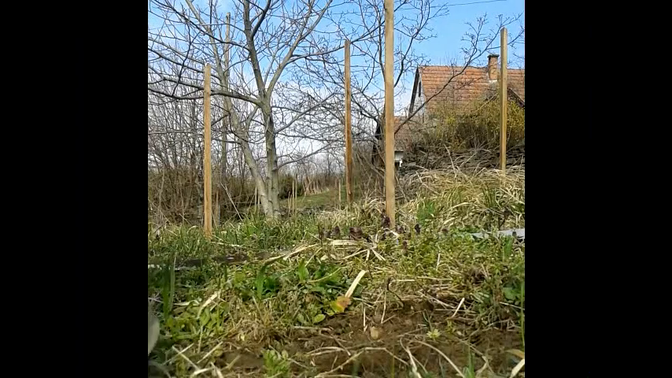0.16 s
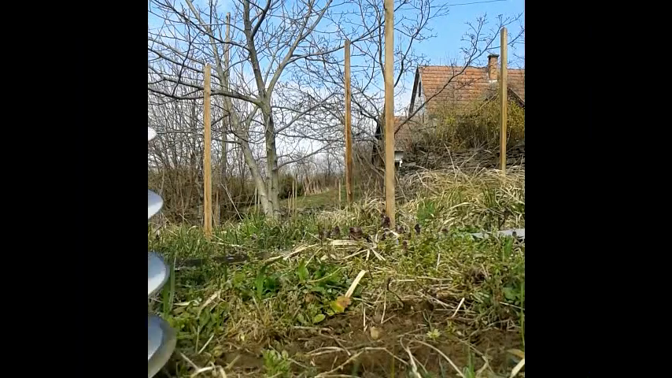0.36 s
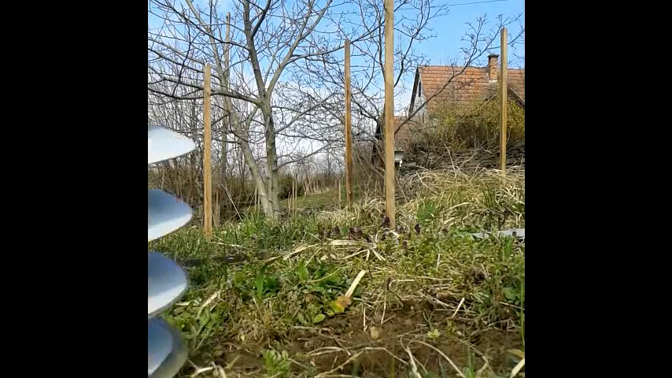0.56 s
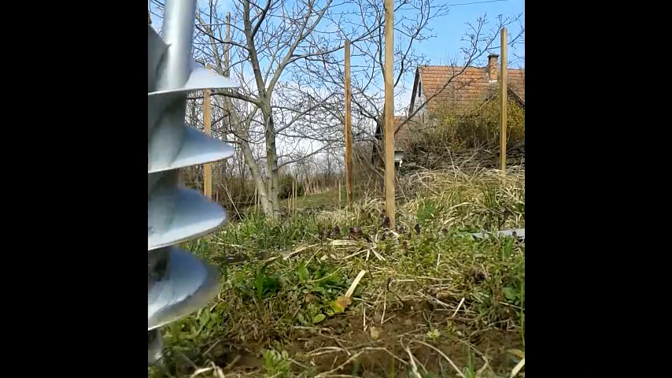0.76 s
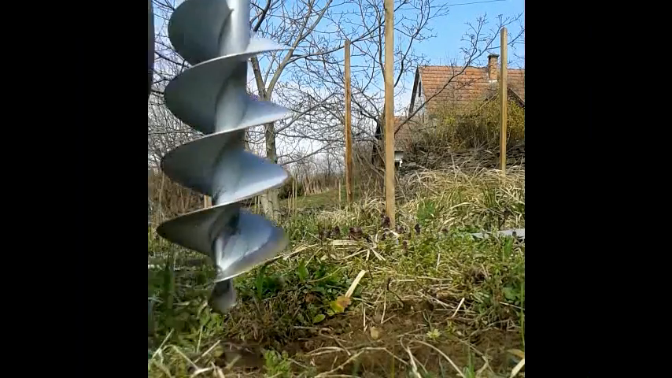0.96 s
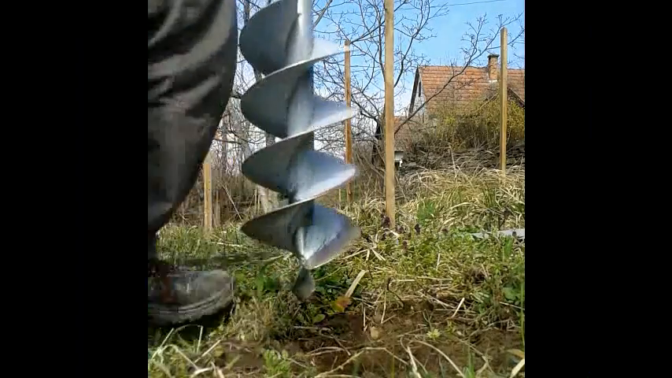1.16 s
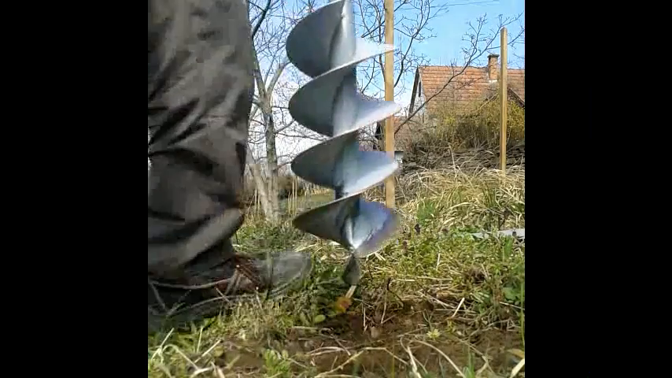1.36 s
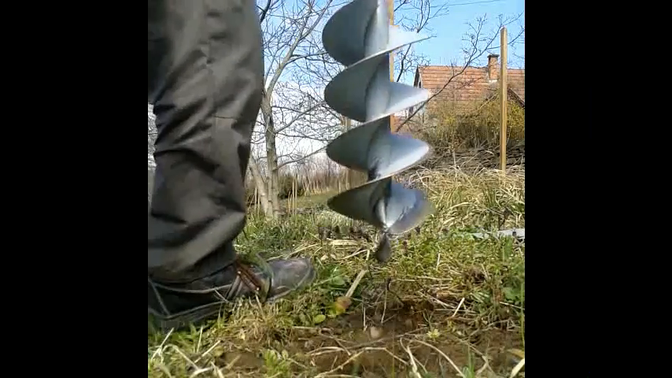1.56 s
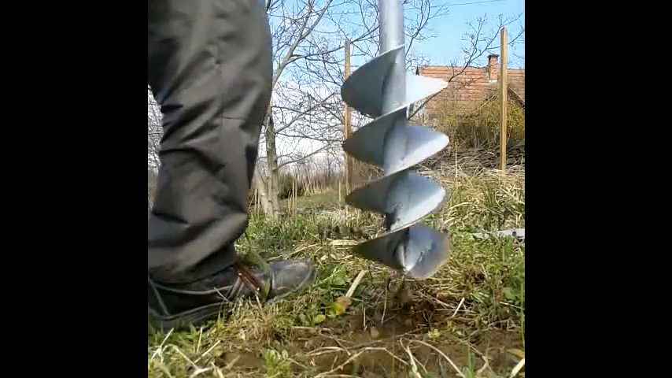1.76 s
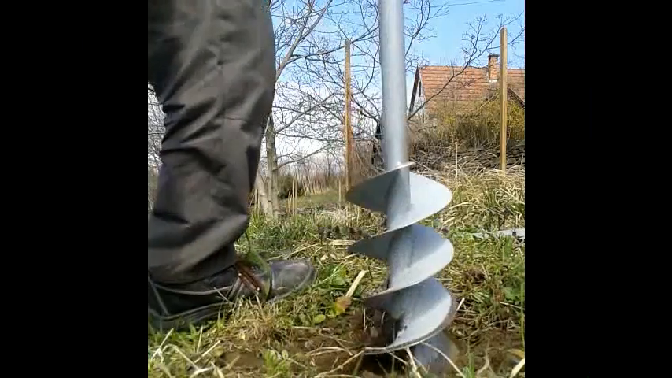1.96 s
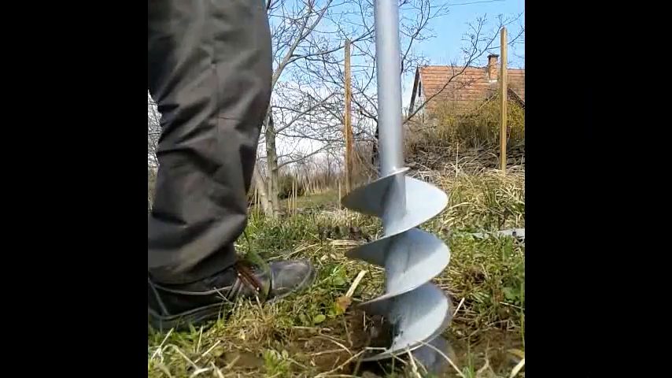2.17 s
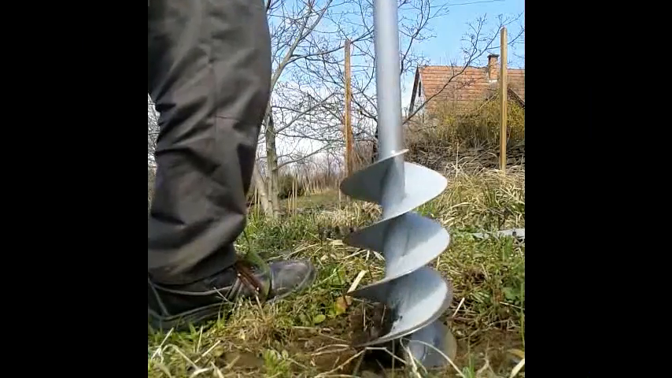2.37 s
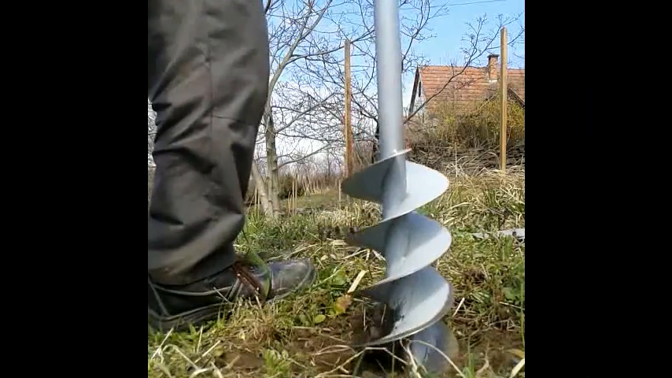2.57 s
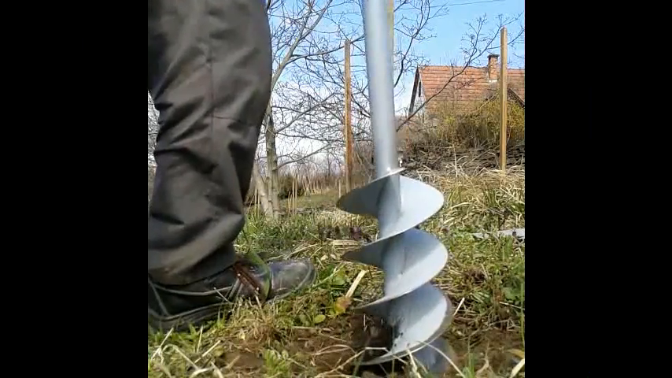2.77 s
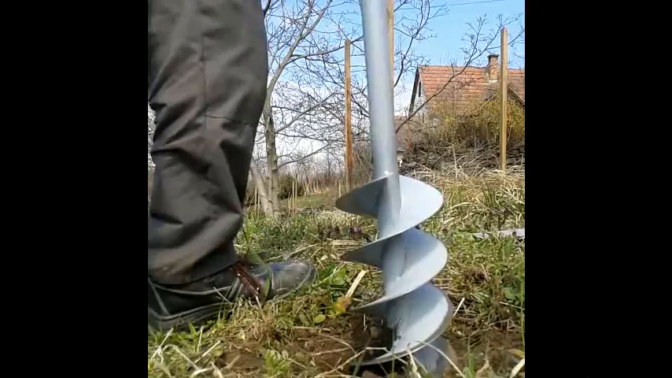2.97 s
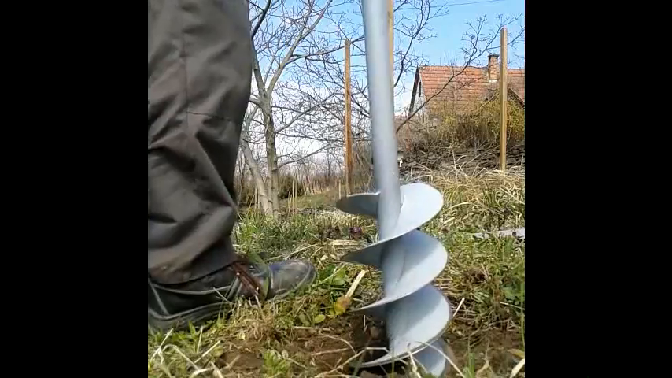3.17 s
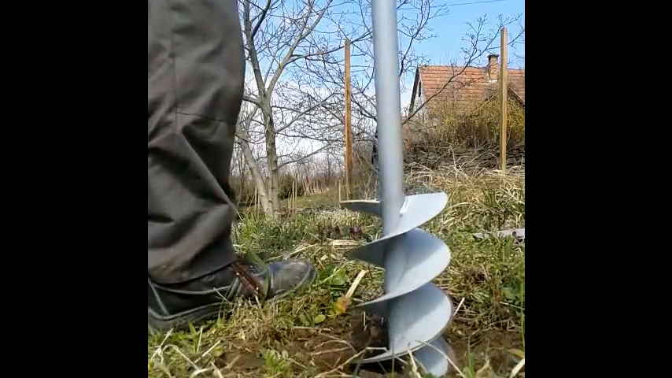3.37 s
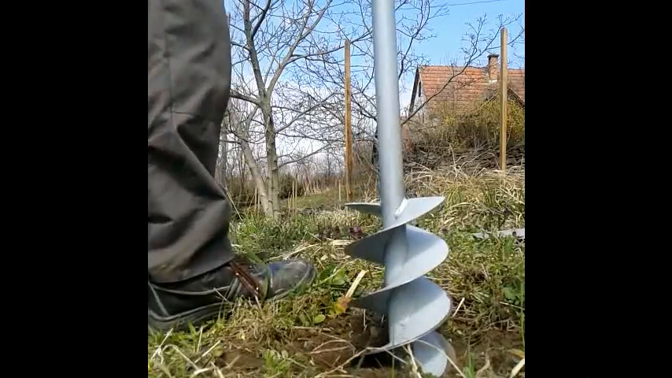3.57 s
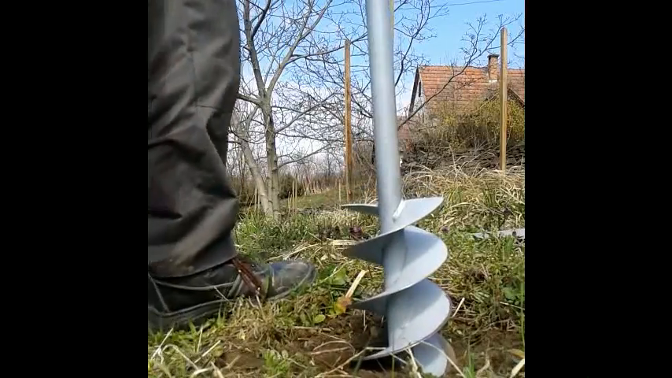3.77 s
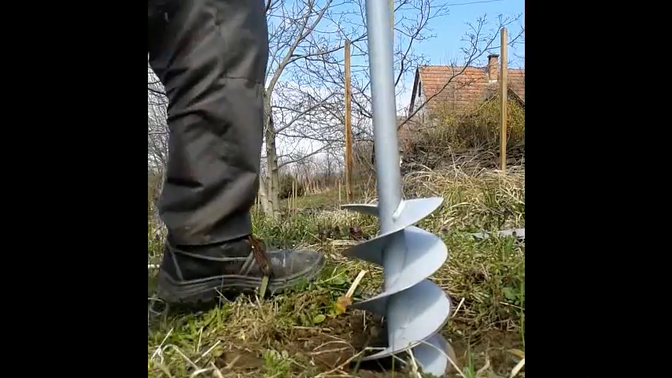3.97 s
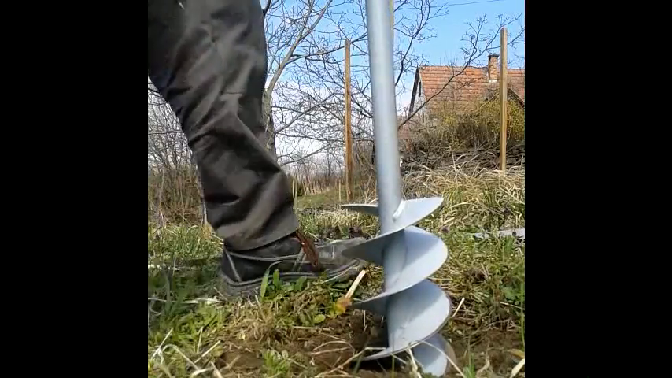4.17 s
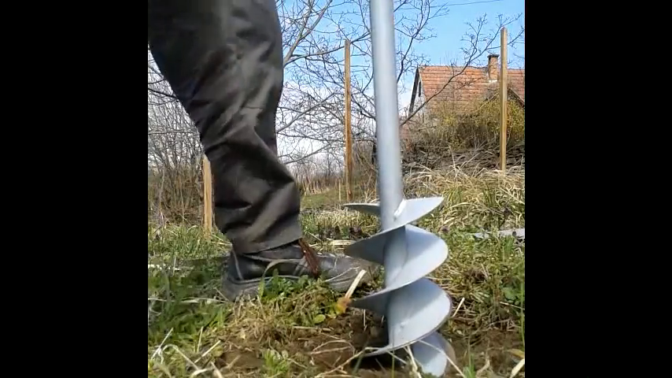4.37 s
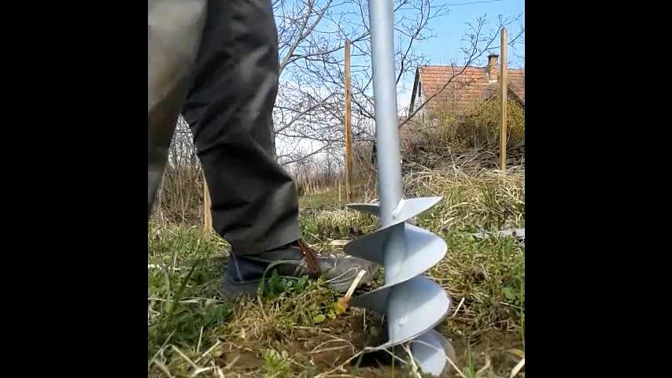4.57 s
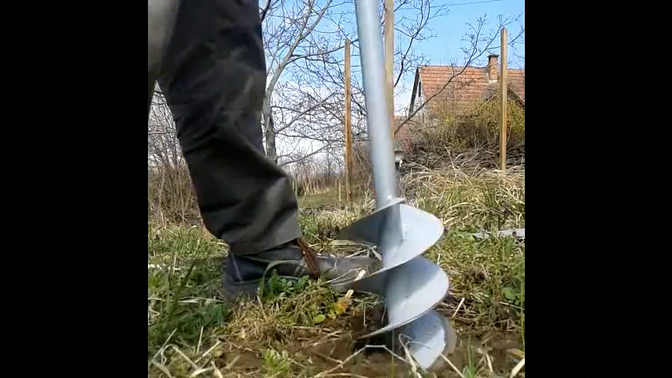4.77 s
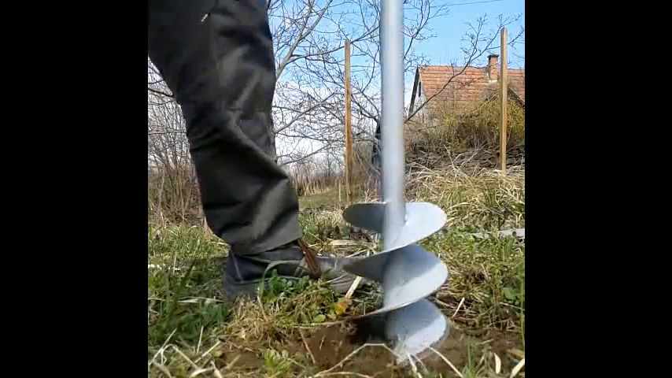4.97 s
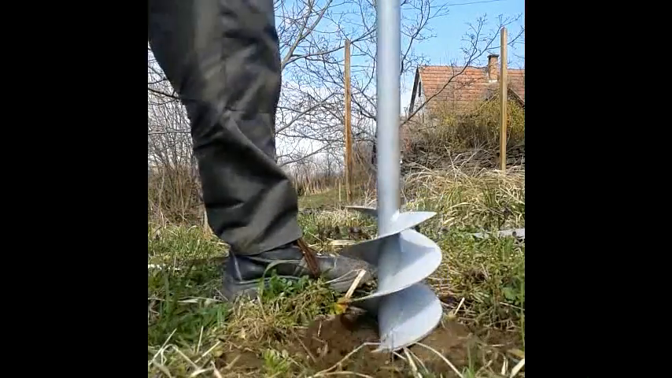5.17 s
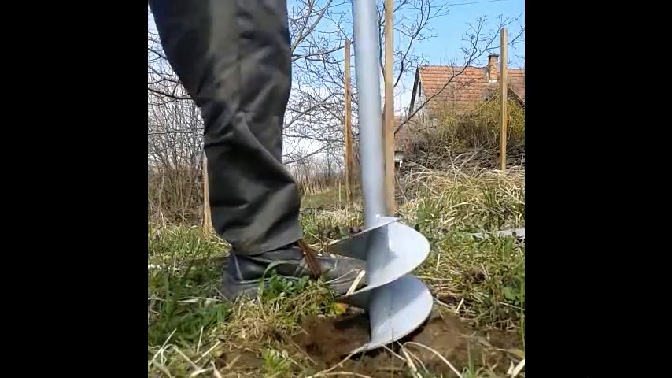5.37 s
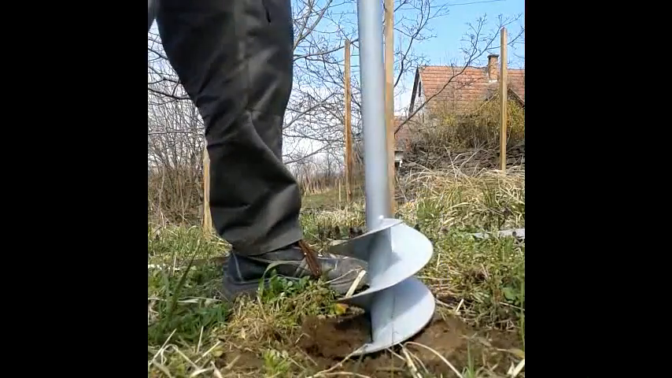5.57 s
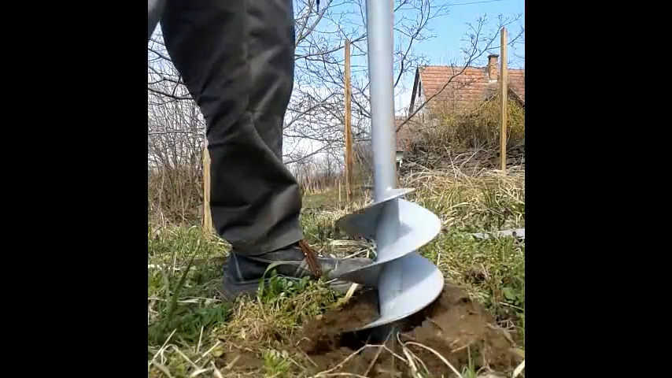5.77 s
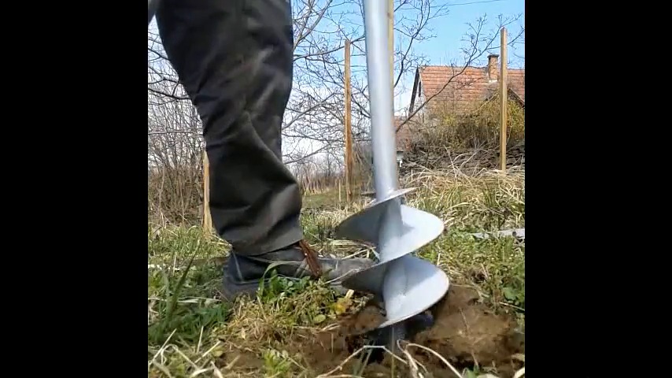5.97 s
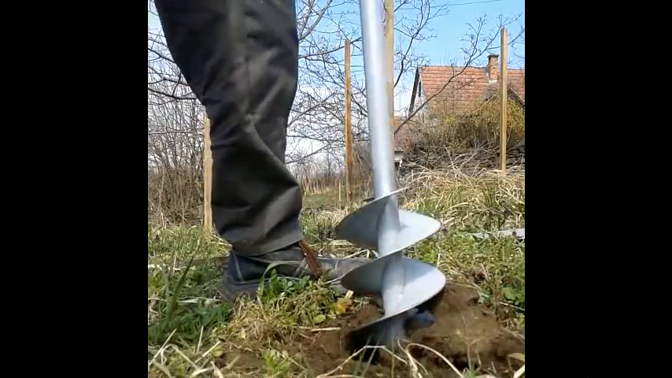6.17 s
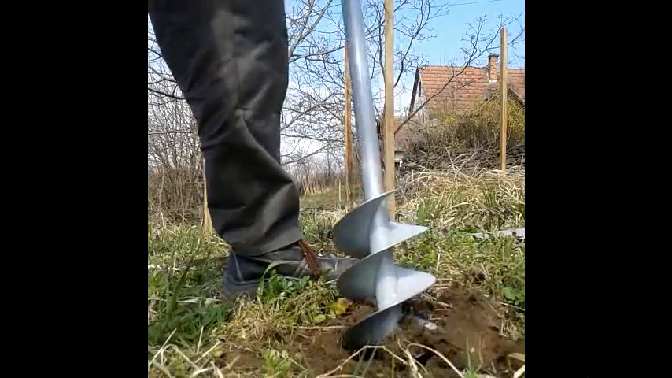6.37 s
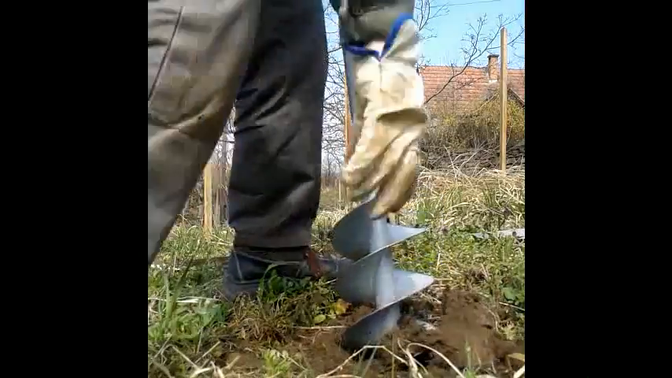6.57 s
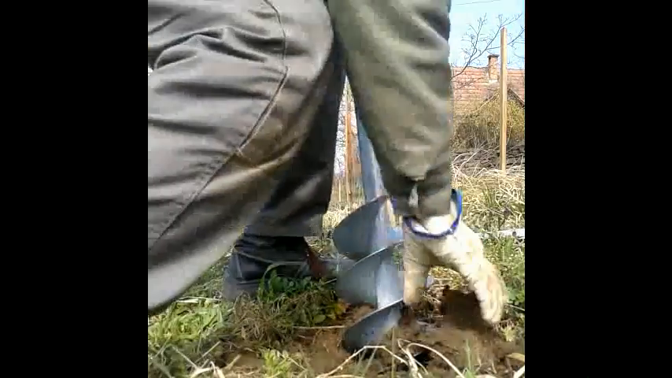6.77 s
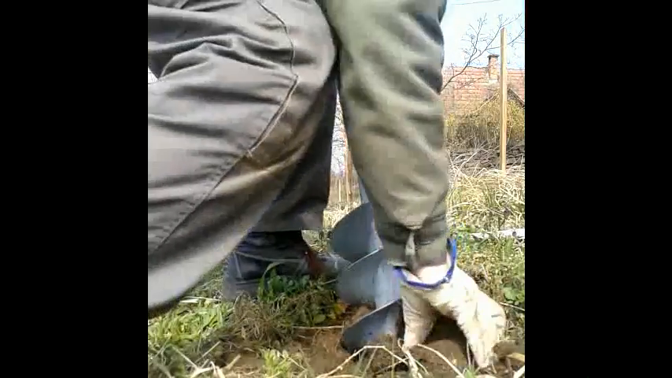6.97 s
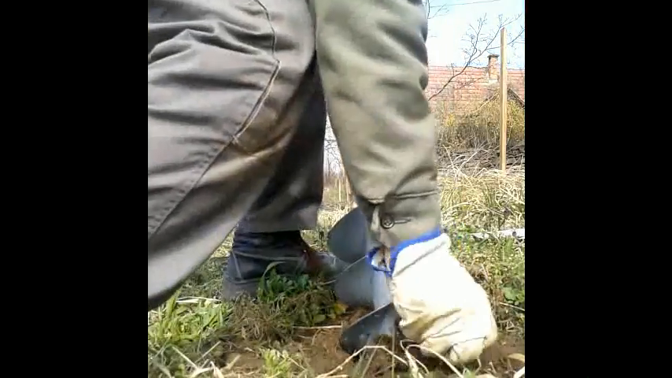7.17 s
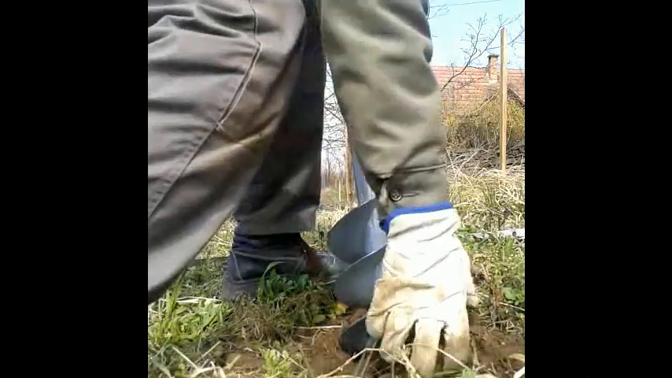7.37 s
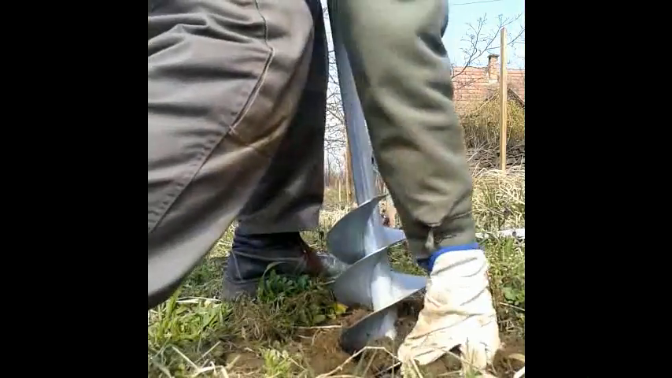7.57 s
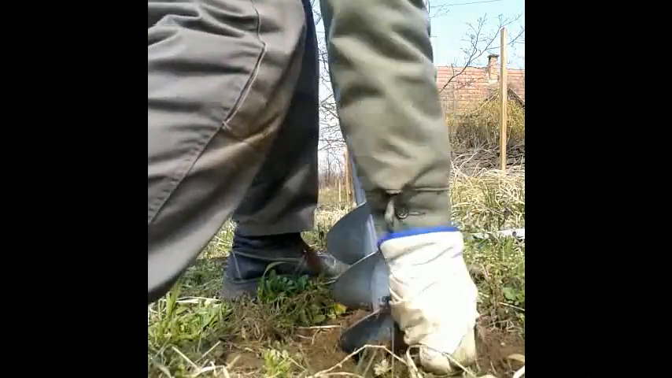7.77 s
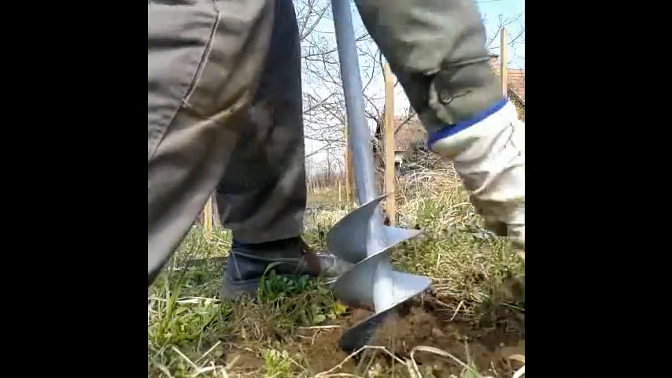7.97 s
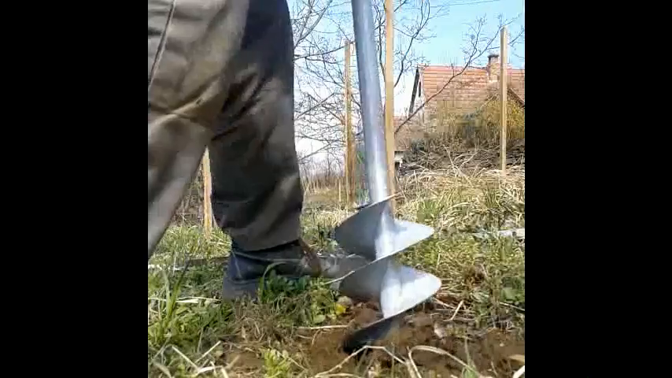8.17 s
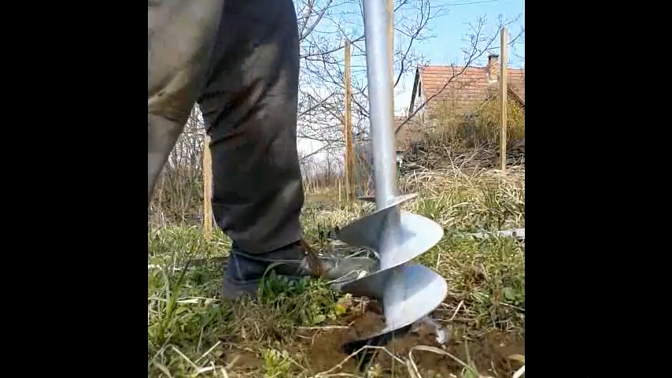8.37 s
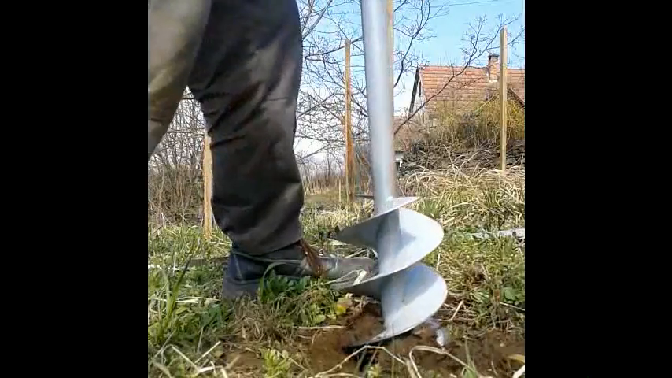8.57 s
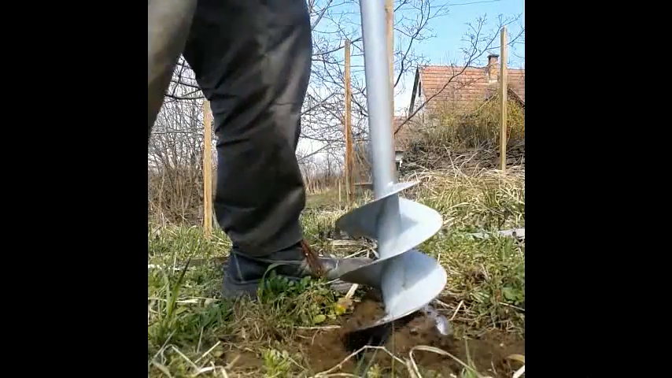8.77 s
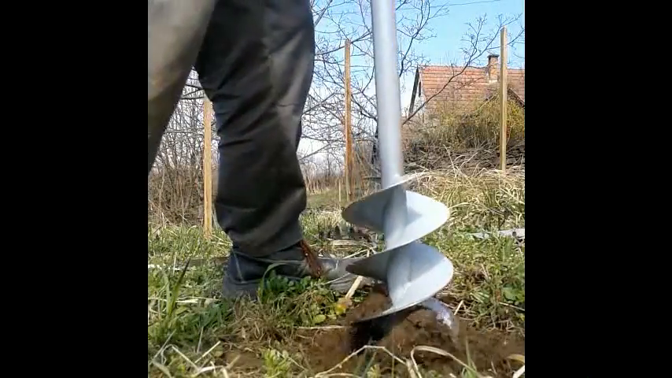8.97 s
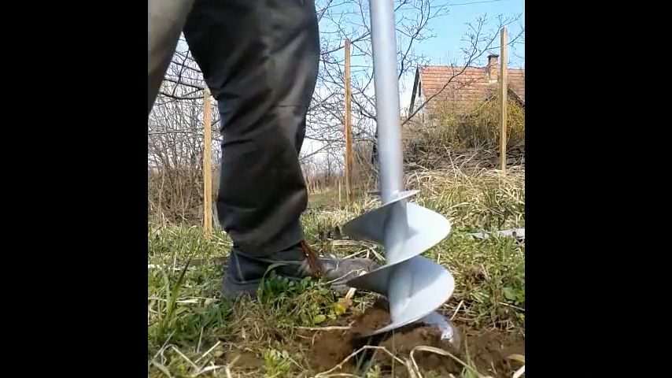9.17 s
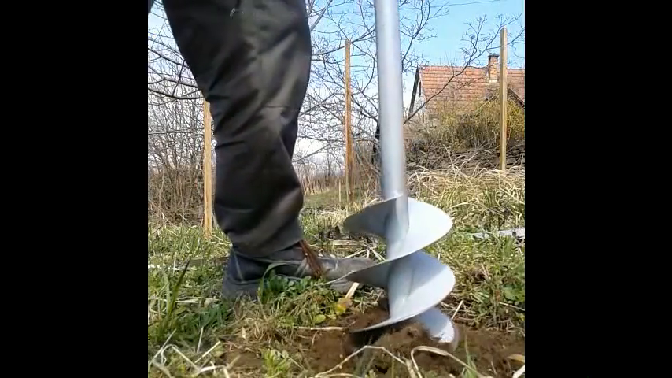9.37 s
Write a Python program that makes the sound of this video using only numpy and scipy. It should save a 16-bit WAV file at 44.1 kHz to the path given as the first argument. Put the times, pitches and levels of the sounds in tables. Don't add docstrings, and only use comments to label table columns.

```python
import sys
import numpy as np
from scipy import signal
from scipy.fft import rfft, irfft
from scipy.io import wavfile
from scipy.ndimage import uniform_filter1d

SR = 44100
rng = np.random.default_rng(int(sys.argv[2]) if len(sys.argv) > 2 else 0)


def generate_wav(signal):
    frames = np.transpose(np.atleast_2d(signal))
    scaled = np.clip(frames, -1, 1) * 32767
    pcm = np.round(scaled).astype(np.int16)
    wavfile.write(sys.argv[1], SR, pcm)


def nominal_scale(level):
    x = np.asarray(level, float) / 20
    return 10 ** x


N = 415863


def unit(x):
    return x / np.sqrt(np.mean(x ** 2))


def colour(x, points):
    size = 2048
    hz, db = np.transpose(points)
    f = np.maximum(np.arange(size // 2 + 1) * SR / size, 1)
    gain_db = np.interp(np.log(f), np.log(hz), db)
    cepstrum = irfft(np.log(nominal_scale(gain_db)), size)
    cepstrum[1:size // 2] *= 2
    cepstrum[size // 2 + 1:] = 0
    impulse = irfft(np.exp(rfft(cepstrum)), size)
    return unit(signal.fftconvolve(x, impulse)[:N])


def ring(x, hz, t60):
    decay = np.log(1000) / (max(t60, 0.004) * SR)
    pole = np.exp(2j * np.pi * hz / SR - decay)
    return signal.lfilter([1], [1, -pole], x).imag


def walk(rate):
    k = int(SR / rate)
    held = np.repeat(rng.standard_normal(N // k + 1), k)
    return 1.3 * uniform_filter1d(uniform_filter1d(held, k), k)[:N]


def grains(rate, spread_db, bed):
    hit = rng.random(N) < rate / SR
    grain_size = np.minimum(rng.exponential(size=N), 3.0)
    clicks = hit * rng.standard_normal(N) * nominal_scale(spread_db * grain_size)
    return unit(unit(clicks) + bed * rng.standard_normal(N))


def swell(rise, t60):
    t = np.arange(SR // 2) / SR
    build_up = (1 - np.exp(-t / max(rise, 2e-4))) ** 2
    shape = build_up * np.exp(-np.log(1000) * t / max(t60, 0.005))
    return shape / shape.max()


def add(track, s, piece):
    i = int(s * SR)
    track[i:i + len(piece)] += piece[:N - i]


# frequency in Hz, level in dB per Hz.
AIR_TONE, AIR_DB = [(12, -18), (20, -9), (81, -10), (145, -10.5), (214, -13.5), (283, -14.5), (841, -23),
                    (1640, -21), (3690, -23), (6440, -22), (8510, -21), (11900, -31), (15700, -37)], -48


def air():
    gusts = nominal_scale(-66.5 + 2.9 * walk(5.0)) * unit(ring(rng.standard_normal(N), 50.0, 0.022))
    hush = colour(rng.standard_normal(N), AIR_TONE)
    return nominal_scale(AIR_DB - 6.5 + 1.32 * walk(2.434)) * hush + gusts


# start in seconds, length in seconds, grit level in dB, crumbs in dB relative to grit.
STROKES = [(0.0, 0.095, -52, -4.5), (0.16, 0.32, -50.5, -4), (0.7, 0.06, -42.5, -6),
           (0.92, 0.15, -51.5, -6), (1.294, 0.027, -39.5, -10), (1.474, 0.059, -58, -13),
           (2.043, 0.51, -50.5, -16), (2.803, 0.019, -44, -10), (3.023, 0.047, -40, -9),
           (3.125, 0.053, -33.5, -10), (3.292, 0.16, -36.5, -8.5), (3.586, 0.055, -54.5, -9),
           (4.052, 0.08, -45, -13), (4.189, 0.031, -41, -8.5), (4.362, 0.23, -45, -4.5),
           (4.67, 0.23, -40.5, -7), (4.917, 0.22, -38, -9), (5.125, 0.085, -37.5, -6),
           (5.444, 0.028, -54.5, -5.5), (5.796, 0.14, -45, -8.5), (6.12, 0.079, -43.5, -12.5),
           (6.37, 0.18, -43.5, -8), (6.688, 0.53, -50.5, -2.5), (7.577, 0.16, -51.5, 1.5),
           (7.893, 0.38, -58.5, -3.5), (8.177, 0.08, -47.5, -8), (8.42, 0.19, -50.5, -10),
           (8.63, 0.21, -49, -8), (8.984, 0.24, -49, -18), (9.357, 0.15, -43, -1.5)]
PRESS_DB_PER_S, EASE_DB_PER_S = 192.5, 120.5
REST_GRIT_DB, REST_CRUMBS_DB, REST_RUMBLE_DB = -93.5, -78, -64.5


def rubbing():
    t = np.arange(N) / SR
    grit = np.full(N, nominal_scale(REST_GRIT_DB))
    crumbs = np.full(N, nominal_scale(REST_CRUMBS_DB))
    for s, length, db, crumbs_db in STROKES:
        press = PRESS_DB_PER_S * np.maximum(s - t, 0)
        ease = EASE_DB_PER_S * np.maximum(t - s - length, 0)
        stroke = nominal_scale(db - press - ease)
        grit += stroke
        crumbs += nominal_scale(crumbs_db) * stroke
    return grit, crumbs


# start in seconds, peak in dB, pitch in Hz.
KNOCKS = [(0.529, -36, 317), (0.587, -28.5, 363), (0.614, -27, 322), (0.719, -32, 343), (0.763, -24.5, 342),
          (0.974, -4, 693), (0.95, -14, 340), (0.99, -11, 338), (1.019, -11, 270), (1.05, -25.5, 320),
          (1.27, -35.5, 336), (1.124, -31, 352), (1.209, -36, 367), (1.338, -23, 596), (1.914, -14, 617),
          (1.915, -1.5, 1010), (2.199, -24.5, 1087), (2.191, -27, 624), (2.2, -27, 65.7),
          (2.435, -24.5, 55), (2.655, -26.5, 60), (2.432, -44, 740), (2.654, -48, 716), (4.466, -25.5, 746),
          (4.62, -25, 620), (4.659, -10, 340), (5.035, -20, 650), (5.144, -15, 703), (5.227, -13, 708),
          (8.61, -32.5, 515)]
KNOCK_RISE_S, KNOCK_T60_S, KNOCK_RUMBLE_DB = 0.0034, 0.067, -25.5
# start in seconds, peak in dB, pitch in Hz.
TREADS = [(0.919, -21.5, 316), (0.965, -9, 297), (1.364, -28, 163), (1.915, -46, 128), (4.22, -29, 193),
          (4.46, -21, 330), (4.611, -6.5, 96), (4.783, -30, 230), (5.076, -29, 242), (5.216, -21.5, 293),
          (5.673, -29, 114), (8.589, -36, 145), (8.887, -24.5, 124), (9.104, -20, 94), (9.364, -26, 91.5)]
TREAD_RISE_S, TREAD_T60_S, TREAD_RUMBLE_DB = 0.0021, 0.12, -19.5
# frequency in Hz, level in dB per Hz.
RUMBLE_TONE = [(24, -38), (40, -3), (97, 1.5), (204, -5.5), (362, -3.5), (721, -7.5), (900, -24.5),
               (1170, -22.5), (1980, -120)]
RUMBLE_RE_CRUMBS_DB = -20


def turf(crumb_force):
    force = nominal_scale(REST_RUMBLE_DB) + nominal_scale(RUMBLE_RE_CRUMBS_DB) * crumb_force
    force = force * nominal_scale(0.86 * walk(25.0))
    rumble = colour(grains(410.0, 3.1, 0.97), RUMBLE_TONE)
    thuds = np.zeros(N)
    for rows, rise, t60, shake_db in ((KNOCKS, KNOCK_RISE_S, KNOCK_T60_S, KNOCK_RUMBLE_DB),
                                      (TREADS, TREAD_RISE_S, TREAD_T60_S, TREAD_RUMBLE_DB)):
        push = swell(rise, t60)
        for s, db, hz in rows:
            add(force, s, nominal_scale(db + shake_db) * push)
            rough_push = push * rng.standard_normal(len(push))
            tone = ring(rough_push, hz, min(0.061, 26 / hz))
            add(thuds, s, nominal_scale(db - 10.0) * tone / np.abs(tone).max())
    return thuds + force * rumble


# start in seconds, end in seconds.
BOOTS_MOVE = [
    (0.0, 1.19),
    (4.18, 4.22),
    (8.1, 8.35),
]
# frequency in Hz, level in dB per Hz.
GRASS_TONE = [(1800, -24.5), (2800, -9), (3900, 3.5), (5000, -10.5), (9500, -11), (12000, -4),
              (15700, -12.5)]
GRASS_RE_GRIT_DB = -3


def grass(grit_force):
    t = np.arange(N) / SR
    moving = sum(1.0 * (t >= a) * (t < b) for a, b in BOOTS_MOVE)
    moving = uniform_filter1d(moving, size=2000)
    swish = colour(grains(2000.0, 2.9, 0.91), GRASS_TONE)
    return nominal_scale(GRASS_RE_GRIT_DB) * moving * grit_force * swish


# start in seconds, peak in dB.
SCUFFS = [(2.07, -52), (2.102, -45), (2.172, -56), (2.313, -44), (2.554, -45.5), (2.585, -50), (3.14, -59),
          (3.224, -51), (3.371, -36), (4.89, -45), (4.92, -41), (5.035, -35.5), (5.11, -29.5),
          (5.143, -24.5), (5.191, -27), (5.225, -32), (5.262, -59), (5.68, -45), (5.785, -53), (5.953, -58),
          (8.82, -55), (8.997, -40), (9.311, -42.5), (9.348, -42), (9.39, -38)]
SCUFF_RISE_S, SCUFF_T60_S = 0.0036, 0.13
# frequency in Hz, level in dB, t60 in seconds.
HOLLOW = [(1116, -7, 0.09), (1336, -3, 0.031), (1573, -11, 0.028)]


def scuffing(crumbs):
    force = np.zeros(N)
    for s, db in SCUFFS:
        add(force, s, nominal_scale(db) * swell(SCUFF_RISE_S, SCUFF_T60_S))
    rattle = sum(nominal_scale(db) * unit(ring(crumbs, hz, t60)) for hz, db, t60 in HOLLOW)
    return force * rattle


# start in seconds, peak in dB, crumbs in dB relative to grit.
SNAPS = [(0.746, -32, -9), (0.964, -18.5, -8), (1.362, -20.5, -9.5), (2.094, -21.5, -10),
         (2.17, -23.5, -4.5), (2.187, -16.5, -12), (2.317, -27.5, -10), (2.555, -40, 3), (2.589, -45, 3),
         (3.227, -33.5, 7), (4.217, -33, 3.5), (4.471, -26, -22), (4.789, -29, 0), (5.037, -21, -10),
         (5.077, -44, -4), (5.19, -16, -26), (5.783, -34, -7), (5.957, -32, 4), (6.17, -29.5, -6),
         (7.086, -25.5, -10.5), (7.698, -29, -29), (9.13, -23, -12), (9.24, -36.5, -10), (9.27, -27.5, -19),
         (0.29, -43, 2)]
SNAP_RISE_S, SNAP_T60_S = 0.0015, 0.062
# start in seconds, peak in dB, crumbs in dB relative to grit.
CLODS = [(0.17, -25, -8.5), (0.355, -49, -27), (0.916, -27.5, -7), (0.939, -24, -9.5), (1.332, -23, -10.5),
         (2.069, -34.5, -6), (3.354, -61, -8), (4.593, -20.5, -3.5), (4.889, -21, -2.5), (4.918, -29, 0.5),
         (5.114, -25, -10), (5.209, -21, -8), (5.228, -18.5, -7), (5.252, -14.5, -17.5), (5.675, -17, -9),
         (5.713, -25, -19), (7.62, -26.5, -33), (8.212, -33, -15), (8.575, -25.5, -7), (8.992, -34, -12),
         (9.355, -34, 0)]
CLOD_RISE_S, CLOD_T60_S = 0.0045, 0.13
# start in seconds, peak in dB, crumbs in dB relative to grit.
TICKS = [(0.466, -32.5, 9), (5.663, -26, -1), (6.191, -20, -2), (6.388, -37, 3), (6.903, -48, 9),
         (7.101, -15.5, -19), (7.168, -39, 9.5), (7.639, -32, -15), (8.256, -31, -18), (9.058, -23, -25),
         (5.078, -21.5, -8)]
TICK_RISE_S, TICK_T60_S = 0.00072, 0.03


def breaking(fine, coarse):
    for rows, rise, t60 in ((SNAPS, SNAP_RISE_S, SNAP_T60_S), (CLODS, CLOD_RISE_S, CLOD_T60_S),
                            (TICKS, TICK_RISE_S, TICK_T60_S)):
        for s, db, crumbs_db in rows:
            add(fine, s, nominal_scale(db - 15.5) * swell(rise, t60))
            add(coarse, s, nominal_scale(db + crumbs_db - 11.0) * swell(3.0 * rise, 0.74 * t60))


# start in seconds, peak in dB, crumbs in dB relative to grit,
# t60 in seconds, steel ring in dB.
STABS = [(1.904, -4.5, -17, 0.076, -23), (1.9094, 16.5, -14.5, 0.029, -2.5), (1.916, 4.5, 2, 0.053, 1.5),
         (2.1992, 6, -4.5, 0.043, 0.5), (2.429, 3, -23, 0.061, -0.5), (2.438, 14, -11.5, 0.04, 1),
         (2.645, -11.5, -13, 0.12, -5), (2.6567, 6, -8, 0.049, 0.5), (5.144, -9.5, -17, 0.23, 1),
         (5.928, -7, -5.5, 0.077, -15), (7.754, -5.5, -13, 0.049, -9), (7.761, -2.5, -15.5, 0.055, -12),
         (8.875, -6.5, -23, 0.098, -9), (8.883, 1.5, -10.5, 0.049, -7.5), (8.899, -6, -26, 0.04, -6),
         (9.085, -17, -27, 0.048, -9), (9.097, -15.5, -8, 0.08, -4), (9.105, -4, -12, 0.053, -4.5)]
STAB_RISE_S = 0.0012


def stabbing(coarse):
    blow = np.zeros(N)
    for s, db, crumbs_db, t60, _ in STABS:
        add(blow, s, nominal_scale(db - 15.5) * swell(STAB_RISE_S, t60))
        add(coarse, s, nominal_scale(db + crumbs_db - 13.0) * swell(2.16 * STAB_RISE_S, 1.11 * t60))
    return blow


# frequency in Hz, level in dB, t60 in seconds.
STEEL = [(1938, -6, 0.11), (2277, -10.5, 0.089), (3196, -10, 0.12), (4390, -16, 0.23), (4723, -12.5, 0.38),
         (4970, -3, 0.1), (5180, -6, 0.14), (5130, 0.5, 0.12), (5500, -0.5, 0.06), (6200, -4, 0.16),
         (6440, 0.5, 0.11), (7620, -5, 0.062), (8040, -0.5, 0.055), (8650, -2, 0.065),
         (620, -7.5, 0.021), (1010, 0, 0.03), (1370, -9.5, 0.04), (2560, -11.5, 0.04), (2800, -17, 0.06),
       (3000, -16.5, 0.069), (5200, -5, 0.085), (5480, -5, 0.07), (6680, 0, 0.048), (7160, -1, 0.05),
       (7550, 0, 0.045), (8550, -8, 0.048), (9000, -13, 0.054), (10250, -7.5, 0.042)]
MODE_SCATTER_DB, MODE_SCATTER = 2, 0.001


def steel(grit):
    out = np.zeros(N)
    modes = STEEL
    for s, db, _, t60, ring_db in STABS:
        push = swell(STAB_RISE_S, 0.92 * t60)
        shake = push * np.resize(grit[int(s * SR):], len(push))
        chance = rng.standard_normal((len(modes), 2))
        for (hz, mode_db, decay), (a, b) in zip(modes, chance):
            level = nominal_scale(db + ring_db + mode_db - 48.5 + MODE_SCATTER_DB * a)
            add(out, s, level * ring(shake, hz * (1 + MODE_SCATTER * b), decay))
    return out


# frequency in Hz, level in dB per Hz.
FINE_TONE = [(2240, -33.5), (3800, -34.5), (3990, -11.5), (5120, -3), (5830, -0.5), (8080, -0.5),
             (9600, -4), (11400, -13), (14200, -20.5), (15700, -22.5)]
# frequency in Hz, level in dB per Hz.
COARSE_TONE = [(260, -32), (450, -16.5), (718, -13), (890, -8.5), (1290, -3), (2030, -6.5), (2250, -8.5),
               (2580, -9), (3170, -11), (3720, -13), (4200, -15.5), (5460, -35.5), (9240, -120)]
# frequency in Hz, level in dB per Hz.
BLOW_TONE = [(1940, -47.5), (3300, -18.5), (4010, -16), (5380, -2), (8730, -6), (9440, -11), (10400, -17.5),
             (15700, -35.5)]


def soil(grit_force, crumb_force):
    slip = walk(35.0)
    fine = grit_force * nominal_scale(2.63 * slip + 0.29 * walk(90.0))
    coarse = crumb_force * nominal_scale(2.2 * slip + 0.8 * walk(60.0))
    breaking(fine, coarse)
    blow = stabbing(coarse)
    grit = grains(3000.0, 1.1, 1.0)
    crumbs = grains(900.0, 2.14, 1.0)
    scrape = fine * colour(grit, FINE_TONE)
    crunch = coarse * colour(crumbs, COARSE_TONE)
    burst = blow * colour(grit, BLOW_TONE)
    return grass(fine) + scuffing(crumbs) + scrape + crunch + burst + steel(grit)


def scene():
    grit_force, crumb_force = rubbing()
    return (air() + turf(crumb_force) + soil(grit_force, crumb_force))[None]


def band_limit(x):
    return signal.sosfilt(signal.butter(12, 15880, fs=SR, output="sos"), x)


PORT_DIP_HZ, PORT_DIP_Q, PORT_DIP_SHARE = 3780, 7, 0.7
CLIP = 0.91


def record(dry):
    dipped = signal.lfilter(*signal.iirnotch(PORT_DIP_HZ, PORT_DIP_Q, fs=SR), dry)
    x = (dry + PORT_DIP_SHARE * (dipped - dry)) / CLIP
    overloaded = CLIP * x / (1 + x ** 6) ** (1 / 6)
    return band_limit(overloaded + 0.0011)


dry = scene()
out = record(dry)
generate_wav(out)
```